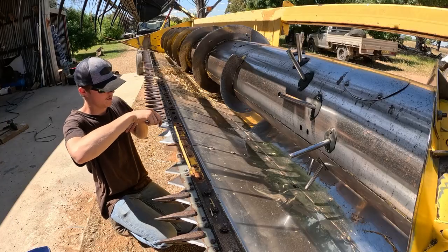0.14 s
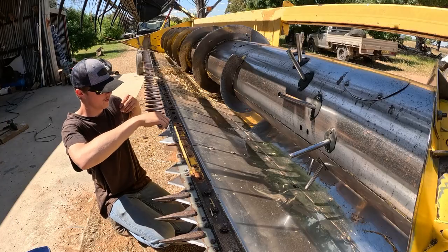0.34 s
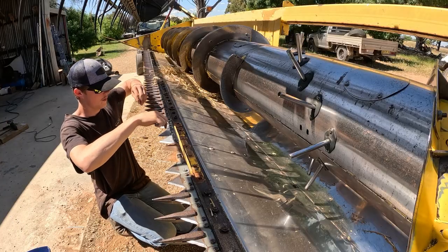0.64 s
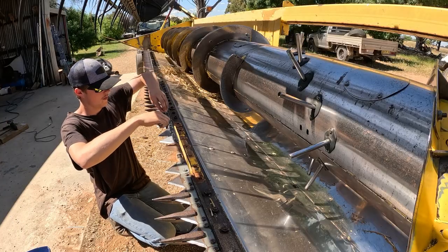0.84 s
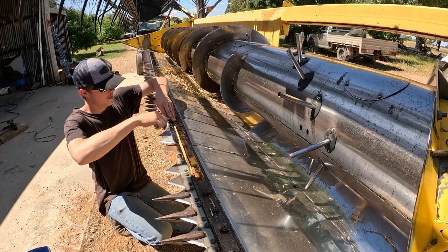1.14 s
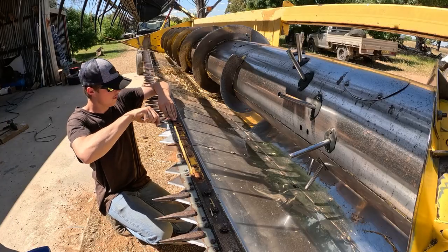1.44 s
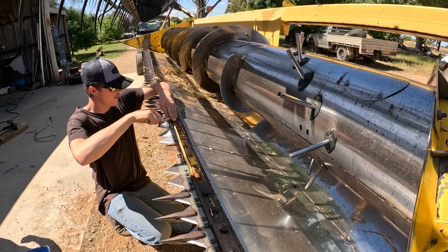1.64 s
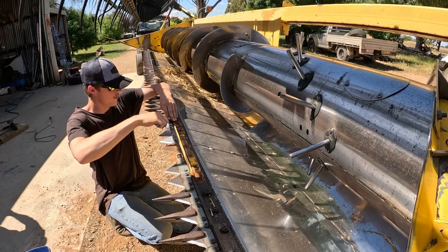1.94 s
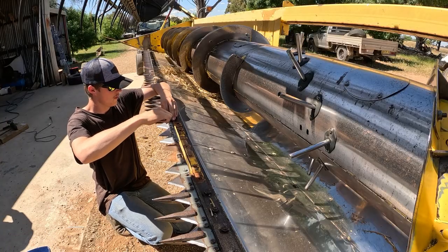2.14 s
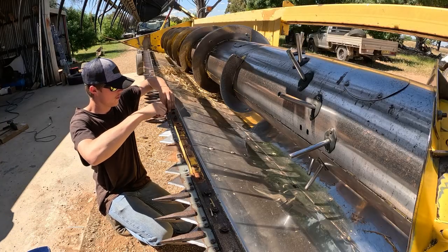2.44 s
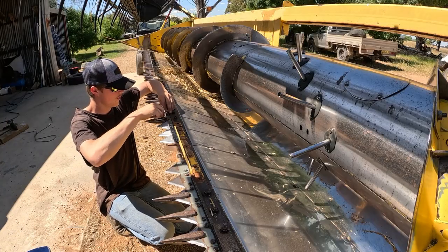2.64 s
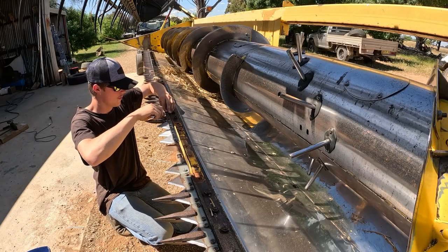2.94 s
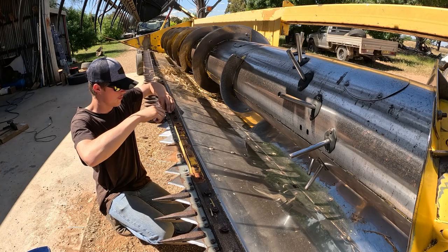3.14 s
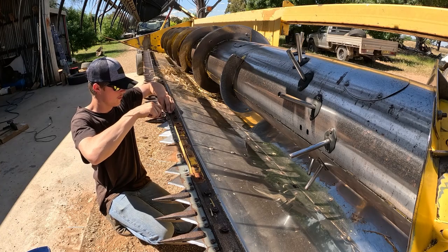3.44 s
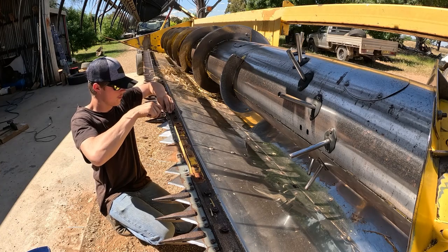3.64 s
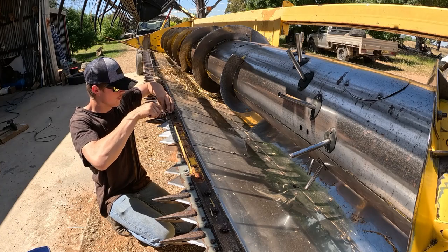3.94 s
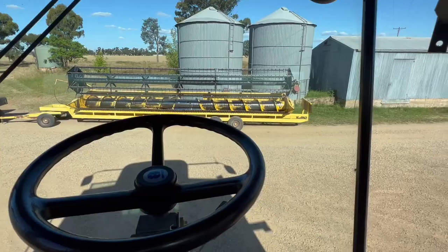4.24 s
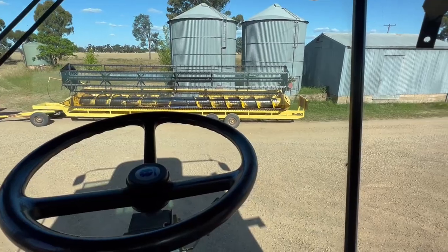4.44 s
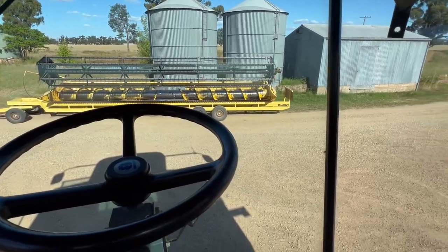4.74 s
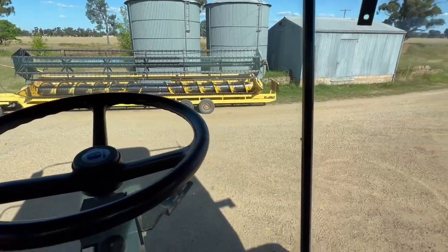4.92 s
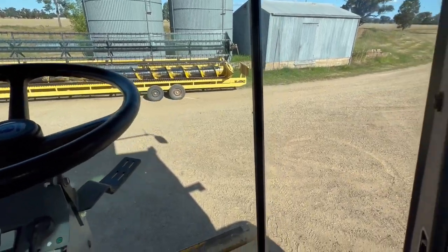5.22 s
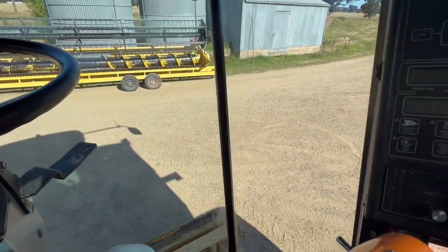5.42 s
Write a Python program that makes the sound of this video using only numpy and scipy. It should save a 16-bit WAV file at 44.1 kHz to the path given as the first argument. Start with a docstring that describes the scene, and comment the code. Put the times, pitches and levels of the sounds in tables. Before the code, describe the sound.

Outdoors, close to the microphone, a small motor whirs and winds down while ratchet teeth click. Tools tap, scrape and knock on a steel trough, over a faint distant diesel idle and open air. Just after four seconds it cuts hard to the inside of a large machine's cab: low engine drone, fan noise, soft bumps and a small rattle on the left.

```python
"""A small motor whirs and sinks to silence, a ratchet ticks, and tools knock and rub on steel close by.
Outdoors beside a harvester front, a big diesel idles some way off as low wavering tones over rumble.
The scene changes at once to the cab of a large machine at idle: crank boom, jolted panels, fan noise.
Motors are sums of shaft multiples, rubs and air are shaped noise, and blows are ringing modes with
noisy contact; each place has its own likeness between the two microphone channels."""
import sys
import numpy as np
from scipy import signal
from scipy.fft import rfft, irfft
from scipy.io import wavfile
from scipy.ndimage import uniform_filter1d

SR = 44100
rng = np.random.default_rng(int(sys.argv[2]) if len(sys.argv) > 2 else 0)


def unload_audio(sound):
    """Save the sound as a 16-bit wav file, at the path given as the first command line argument."""
    columns = np.transpose(np.atleast_2d(sound))
    # keep every value between -1 and 1, then stretch to whole-number steps
    steps = np.round(np.clip(columns, -1, 1) * 32767)
    wavfile.write(sys.argv[1], SR, steps.astype(np.int16))


N = 246078
T = np.arange(N) / SR
F = np.maximum(np.fft.rfftfreq(N, 1 / SR), 1)
CUT_S = 4.124  # yard before, cab after
TOP_HZ = 15800  # upper limit of the microphone channel

# distant diesel tones: (frequency [Hz], level [dB], fading [dB/s])
DIESEL = [(53, -49.5, 1.5), (82.2, -45, 0.36), (130, -44, 1)]
# moments when one hum tone swells or dips: (time [s], length [s], tone [Hz], level change [dB])
HUM_SWELLS = [(0.0091, 0.038, 81.6, -12), (0.13, 0.13, 81.6, 8.5), (3.33, 0.016, 81.6, -16),
              (4, 0.044, 81.6, 0), (3.5, 0.028, 81.6, -10), (0.43, 0.097, 81.6, -14),
              (0.1, 0.067, 129.9, -24), (0.4, 0.11, 129.9, -6), (2, 0.034, 81.6, 5.5),
              (3.573, 0.11, 129.9, -18)]
# colour of the distant rumble: (frequency [Hz], density [dB per Hz])
RUMBLE = [(8.8, -36), (15, -10.5), (64, -1.5), (91, -0.5), (141, -8), (178, -11), (400, -36.5), (520, -62),
          (880, -120)]
# likeness of the two channels in the yard: (frequency [Hz], correlation [-1 to 1])
YARD_LIKE = [(60, 0.99), (130, 1), (290, 0.85), (640, 0.79), (1410, 0.77), (3100, 0.54), (6820, 0.86),
             (15000, 0.33)]
DIESEL_WANDER_DB, RUMBLE_DB = 1, -47

# yard air, 1-4 kHz: (time [s], level [dB])
AIR = [(.7, -58), (.83, -55.5), (1.14, -55), (1.4, -58.5), (2.0, -59.5), (2.15, -67.5), (2.55, -64),
       (3.1, -64), (3.4, -64), (3.56, -70), (3.85, -65), (4.12, -59.5)]
# yard air, 250-900 Hz: (time [s], level [dB])
AIR_BODY = [(.7, -64.5), (1.14, -58), (1.4, -63.5), (3.4, -62), (3.6, -68), (4.12, -72.5)]
# colour of the yard air: (frequency [Hz], density [dB per Hz])
AIR_COLOUR = [(120, -30), (200, 2.5), (422, -11), (479, -13), (618, -15), (842, -23.5), (1300, -19),
              (2700, -26.5), (3480, -30.5), (5490, -33.5), (9660, -42), (15500, -80)]
AIR_TREBLE_DB = -9  # 4.5-10 kHz, relative to 1-4 kHz

# small motor close by: (time [s], shaft rate [Hz], brightness [0-1])
MOTOR = [(0.0, 162.2, 0.26), (.12, 153.6, 0.27), (.21, 159, 0), (.34, 164.7, 0.27), (.39, 166.3, 0.91),
         (.53, 164.9, 0.87)]
# its note, brightening: (multiple of shaft rate, level when dull [dB], level when bright [dB])
MOTOR_ORDERS = [(1, -45, -61), (2, -41, -52), (3, -50.5, -57), (4, -56.5, -49.5), (5, -58, -55),
                (6, -61, -49), (7, -57, -63), (8, -52.5, -54), (9, -59, -59), (10, -61, -57),
                (11, -61, -57), (12, -58, -68), (14, -60.5, -57)]
# colour of its air and brush noise: (frequency [Hz], density [dB per Hz])
WHIR_COLOUR = [(110, -41.5), (180, -2.5), (217, -15.5), (321, -11.5), (401, -16.5), (628, -13),
               (771, -14.5), (1230, -9), (5260, -17), (9550, -28), (14400, -54.5), (15500, -64)]
# likeness of the whir in the two channels: (frequency [Hz], correlation [-1 to 1])
WHIR_LIKE = [(200, 0.91), (3000, 0.66), (9000, 0.75)]
MOTOR_OFF_S, MOTOR_FADE_DB_S = 0.4605, 170
WHIR_DB, WHIR_OFF_S, WHIR_FADE_DB_S = -42.5, 0.63, 65
# throttle shut: the shaft sinks to its idle, heard as one low tone, until it stops
COAST_FROM_S, COAST_SAG_S = .54, .17
IDLE_HZ, IDLE_DB, IDLE_ENDS_S, IDLE_FADE_DB_S = 70.1, -48.5, 2.17, 78.5
COAST_DB = 4.5  # above the idle while the shaft still runs fast

# hands and tools rubbing on steel: (start [s], strongest [s], end [s], pitch of the middle [Hz],
# level of the middle [dB], level 4.5-10 kHz [dB], level 250-900 Hz [dB])
RUBS = [(1.74, 1.78, 2.24, 1450, -54, -62, -60.5), (1.779, 1.798, 2.15, 3300, -59, -57.5, -74),
        (2.225, 2.298, 2.3, 2680, -56.5, -61, -64), (2.35, 2.414, 2.54, 1660, -50, -63, -64),
        (2.61, 2.652, 2.83, 2200, -53.5, -62, -66), (2.791, 2.862, 2.85, 1807, -45.5, -59.5, -56.5),
        (2.837, 2.922, 3.075, 1300, -48.5, -55.5, -48.5), (2.947, 2.977, 3.1, 3100, -48, -64, -62),
        (3.208, 3.238, 3.34, 1640, -42.5, -49, -45), (3.608, 3.649, 3.82, 3000, -54.5, -57.5, -68.5),
        (3.64, 3.681, 3.71, 2300, -47, -55.5, -74), (3.709, 3.724, 3.91, 2190, -63.5, -70, -85),
        (4.02, 4.038, 4.2, 1300, -64, -74, -63)]
# colour of the rubbing noise: (frequency [Hz], density [dB per Hz])
RUB_COLOUR = [(120, -30), (200, -1), (268, -0.5), (339, -10.5), (399, -5.5), (783, -14.5), (974, -3),
              (1810, -2.5), (2900, -6), (3300, -3.5), (3610, -7), (4500, -16), (8500, -25), (15500, -57)]
# resonances under the rubbing: (frequency [Hz], half-width [Hz], boost [dB])
TROUGH = [(398, 23, 8), (577, 36, 8), (1070, 40, 9), (1220, 60, 7), (1600, 70, 4), (2250, 70, 6),
          (2900, 90, 9), (3680, 90, 6), (4000, 80, 5), (4800, 80, 5), (5400, 80, 7), (7480, 200, 3)]
RUB_SPREAD = 1.81  # the middle reaches this factor above and below its pitch

# ratchet teeth: (time [s], level [dB])
TICKS = [(0.2674, -36), (0.3003, -30), (0.3187, -31), (0.3353, -32), (0.3561, -33), (0.381, -31),
         (0.412, -27.5), (0.4695, -35.5), (1.7837, -29.5), (1.8017, -35), (1.817, -28.5), (1.832, -28.5),
         (1.8455, -31), (1.8614, -31), (1.8763, -27.5), (1.8962, -32), (1.9174, -33), (2.2265, -48),
         (2.2476, -49)]
# modes of the ratchet pawl: (frequency [Hz], level [dB], t60 [s])
PAWL = [(2920, -6.5, 0.066), (3860, -10, 0.085), (4820, -18.5, 0.049), (4950, -9, 0.066), (5240, -2.5, .05),
        (5600, -3, 0.036), (6260, -3, 0.039), (6830, 3.5, 0.055), (7430, 3, 0.041), (7840, -0.5, 0.038),
        (9040, -8.5, 0.054), (9600, -4, 0.064), (11400, -10, .015)]
# dull bumps of the sheet floor: (time [s], level [dB], pitch [Hz], t60 [s])
BUMPS = [(0.045, -31, 417, 0.16), (0.098, -32, 500, 0.13), (0.347, -32.5, 162, 0.12),
         (0.993, -37.5, 348, 0.13), (1.688, -39.5, 261, 0.081), (1.785, -49, 520, 0.04),
         (1.866, -39, 420, 0.081), (2.04, -38, 168.9, 0.089), (2.343, -38, 169, 0.17),
         (2.879, -42.5, 320, 0.24), (2.929, -31, 166, 0.082), (3.232, -27.5, 181.6, 0.14),
         (3.265, -30, 184, 0.28)]
# knocks on steel: (time [s], level at 1.2-3.5 kHz [dB], first ring [Hz], longer ring [Hz],
# body relative to that level [dB], treble relative to it [dB], t60 [s],
# steel modes [dB], first ring [dB], longer ring [dB])
KNOCKS = [(0.0431, -31, 4800, 3046, -6, 4, 0.054, 4.5, 1.5, -1.5),
          (0.8687, -36.5, 4470, 6440, -22, -13, 0.013, -20, -17, -14.5),
          (1.101, -50, 7500, 6290, -13, -10, .035, -4, -7, -9),
          (1.219, -52, 2780, 6530, -3, -14, 0.043, -13, -9, -13),
          (1.303, -57, 5000, 7300, -4, -1, 0.05, -8, -10, -7),
          (1.7693, -50, 1520, 3300, 1, -11, 0.047, -4, -1, -8),
          (1.8669, -41, 1583, 2086, 0.5, -11, 0.056, -6, -3, -8),
          (2.0229, -54.5, 3200, 1257, 1, -16, 0.066, -4, -8, -0.5),
          (2.2681, -51.5, 2930, 8020, -6, -0.5, 0.024, 6, -7, -14),
          (2.6136, -40.5, 8140, 2340, -25, 6, .05, 4, -4, -14),
          (2.6676, -54, 5220, 3130, -8, 5, 0.064, 5, -2, -1),
          (2.835, -40, 5200, 2810, -9, -17, 0.078, 0, -13, -7),
          (2.8786, -40, 3530, 6060, -1, -0.5, 0.055, 2, -5.5, -4.5),
          (2.92, -49.5, 5370, 1163, 10, -3, 0.07, -4, -8, 2),
          (2.967, -51.5, 2300, 3670, 4, 1, .08, -3, -3, -3),
          (3.218, -26.5, 2110, 1095, -24, 4, 0.052, 3, -0.5, -19),
          (3.2645, -45, 1940, 3753, 8, -18, 0.037, 0, -11, -6),
          (3.621, -62.5, 5170, 6900, -5, 8, 0.048, -4, -12, 0),
          (3.831, -53, 4930, 2500, -12, -15, .02, -12, -14, -18),
          (3.9648, -60.5, 3121, 9000, -8, 5, 0.027, -8, -4, -10),
          (3.993, -62, 3120, 8000, -10, 6, .025, -8, 0, -8),
          (4.0137, -49.5, 2240, 4300, -8, -7, 0.033, -8, -13, -17)]
# bands of a contact, body to treble: (lower edge [Hz], upper edge [Hz])
KNOCK_BANDS = ((250, 1200), (1200, 3500), (3500, 6500), (6500, 11000))
# modes of the struck steel, before a knock colours them: (frequency [Hz], level [dB], longest t60 [s])
STEEL = [(1080, -6, .06), (2110, -4, .05), (2850, -8, .05), (3750, -8, .05), (4900, -3, .04),
         (5200, -5, .04), (6440, -4, .06), (7350, -3, .05), (8000, -3, .05), (8900, -6, .04),
         (9650, -6, .04)]
# long parts that ring on faintly: (frequency [Hz], level [dB], t60 [s])
BAR = [(400, 6, .3), (570, 6, .35), (1110, 10, .3), (1175, 6, .27), (1940, 6, .25), (2470, 4, .15),
       (3750, 6, .13), (5040, -6, .34), (5490, -4, .5), (5530, -7, .3), (6390, 2, .22), (6585, -3, .25),
       (7290, -7, .38), (8070, -1, .2)]
# colour of close blows at the microphone: (frequency [Hz], gain [dB])
MIC = [(20, 4), (8500, 8.5), (10500, 1.5), (12500, -3), (15800, 3)]
BAR_DB = -19
KNOCK_RISE = .035  # share of the t60

# cab fan noise: (frequency [Hz], density [dB per Hz])
CAB = [(22, -16), (40, -17), (110, 14), (190, -14.5), (450, -15), (600, -11), (820, -11.5), (900, -22),
       (1000, -13.5), (2000, -19.5), (3560, -32), (6450, -33.5), (10000, -50), (15500, -73)]
# its balance: (frequency [Hz], left minus right [dB])
CAB_PAN = [(60, -5.5), (110, -13), (200, 2), (380, 1.5), (700, 2), (1290, 4), (2380, 2), (4400, 7),
           (8120, 9.5), (15000, -17)]
# likeness of the two channels in the cab: (frequency [Hz], correlation [-1 to 1])
CAB_LIKE = [(60, 0.98), (130, -0.64), (290, 0.34), (640, -0.75), (1410, -0.15), (3100, -0.012),
            (6820, 0.12), (15000, -0.5)]
# swell of the fan noise: (time [s], level change [dB])
CAB_SWELL = [(4.12, 3), (4.3, 3.5), (4.45, 0.5), (5.2, -1), (5.4, 1.5), (5.58, 1)]
# cab panels: (frequency [Hz], width [Hz], level [dB])
CAB_MODES = [(189, 14, -3), (238, 20, 5), (317, 14, 1), (430, 30, -6), (515, 20, -6), (600, 25, -6),
             (750, 25, -9)]
# crank of the idling machine: (time [s], rate [turns/s])
CRANK = [(4.12, 16.03), (4.38, 16.0), (4.47, 15.84), (5.25, 15.83), (5.58, 15.73)]
# boom in the cab: (multiple of crank rate, relative level [dB])
CRANK_ORDERS = [(2, -18), (3, -12), (4, -24), (5, 1), (6, -14), (7, -25.5), (8, -18.5), (9, -29), (10, -26),
                (12, -33), (37, -33)]
# soft bumps and creaks in the cab: (time [s], level [dB], pitch [Hz])
CAB_BUMPS = [(4.229, -42.5, 610), (4.299, -45, 612), (4.359, -57, 606), (4.449, -55, 1120),
             (4.585, -45.5, 1534), (4.795, -50, 575), (4.91, -45, 754), (4.999, -43.5, 602),
             (5.124, -41, 548), (5.347, -52, 560)]
# small rattle on the left in the cab: (time [s], level [dB])
RATTLE = [(5.383, -42), (5.397, -43), (5.4111, -44), (5.425, -41), (5.461, -45), (5.478, -47),
          (5.4944, -55), (5.532, -50), (5.5498, -52.5)]
CAB_DB, CAB_BASS_DB = -53.5, -55  # fan noise at 300 Hz-3 kHz, and below 140 Hz
CAB_MODES_DB, BOOM_DB = -59, -38
RATTLE_HZ, RATTLE_PAN_DB = 4740, 16


def undb(db):
    """Gain of a level in dB."""
    return 10 ** (np.asarray(db) / 20)


def unit(x):
    """Scale to rms 1."""
    return x / np.sqrt(np.mean(x ** 2))


def over_time(table):
    """Columns of a table drawn as lines over time."""
    s, *columns = np.transpose(table)
    return [np.interp(T, s, column) for column in columns]


def over_hz(table):
    """A table drawn as a line over log frequency."""
    hz, value = np.transpose(table)
    return np.interp(np.log(F), np.log(hz), value)


def fade(after_s, db_per_s):
    """Gain 1 up to a moment, then sinking steadily."""
    return undb(-db_per_s * np.maximum(T - after_s, 0))


def walk(rate):
    """Random levels held 1 / rate s and smoothed twice; rms 1."""
    k = int(SR / rate)
    steps = np.repeat(rng.standard_normal(N // k + 1), k)
    return unit(uniform_filter1d(uniform_filter1d(steps, k), k)[:N])


def pan(x, db):
    """Place a sound by level difference, left minus right."""
    return x * undb(np.array([[db], [-db]]) / 2)


def add(out, s, y):
    """Mix a sound in at a moment."""
    i = int(s * SR)
    n = min(y.shape[-1], N - i)
    out[..., i:i + n] += y[..., :n]


def tone(hz, waver):
    """A machine tone of rms 1 whose pitch wavers."""
    turn = 2 * np.pi * np.cumsum(hz * (1 + waver * walk(5.96))) / SR
    return np.sqrt(2) * np.sin(turn + rng.uniform(0, 2 * np.pi))


def hiss(colour, like, grain_db=0., pan_db=0 * F):
    """Two-channel noise spectrum of a given colour and likeness; grain makes it crackly."""
    mid, side = (rfft(rng.standard_normal(N) * undb(grain_db * walk(300))) for _ in range(2))
    likeness = np.clip(over_hz(like), -.99, .995)
    mid, side = mid * np.sqrt(1 + likeness), side * np.sqrt(1 - likeness)
    left = (mid + side) * undb(pan_db / 2)
    right = (mid - side) * undb(-pan_db / 2)
    return np.array([left, right]) * undb(over_hz(colour))


def band(spectrum, lo, hi, ref=None):
    """A band of a spectrum as sound, scaled to rms 1 within the band ref (by default itself)."""
    ref_lo, ref_hi = ref or (lo, hi)
    scale = np.std(irfft(spectrum * ((F > ref_lo) & (F < ref_hi)), N))
    return irfft(spectrum * ((F >= lo) & (F < hi)), N) / scale


def three_bands(colour, grain_db, resonances=()):
    """Middle, treble and body of one noise, split by smooth slopes."""
    s = hiss(colour, YARD_LIKE, grain_db)
    s = s * undb(sum(db / (1 + ((F - hz) / w) ** 2) for hz, w, db in resonances))
    high = 1 / (1 + (4250 / F) ** 6)
    low = 1 / (1 + (F / 900) ** 8)
    middle = band(s * (1 - high - low), 200, SR, (1000, 4000))
    treble = band(s * high, 950, SR, (4500, 10000))
    body = band(s * low, 200, SR, (250, 900))
    return middle, treble, body


def ring(modes, scatter_db):
    """Decaying modes with levels, pitches and phases scattered afresh; peak 1."""
    t = np.arange(int(.35 * SR)) / SR
    hz, db, t60 = np.transpose(modes)[:, :, None]
    level, detune, phase = rng.standard_normal((3, len(modes), 1))
    waves = np.sin(2 * np.pi * hz * (1 + 0.004 * detune) * t + 3 * phase)
    tones = undb(db + scatter_db * level) * waves * 1000. ** (-t / t60)
    y = tones.sum(axis=0) * np.minimum(t / 0.002, 1)
    return y / np.abs(y).max()


def cluster(hz, t60):
    """Three close modes that beat into one rough ring."""
    return ring([(hz, 0, t60), (.95 * hz, -7, .7 * t60), (1.06 * hz, -6, .7 * t60)], 1.5)


def crack(bands, levels_db, t60, rise_s):
    """Dense noisy contact: a decaying noise burst in each band, a third of rms 1 before decay."""
    t = np.arange(int(.35 * SR)) / SR
    out = 0
    for edges, db in zip(bands, levels_db):
        sos = signal.butter(2, edges, "band", fs=SR, output="sos")
        mid, side = signal.sosfilt(sos, rng.standard_normal((2, len(t))))
        y = unit(mid + 0.37 * side * np.array([[1], [-1]]))
        out = out + undb(db) / 3 * y * 1000. ** (-t / t60) * np.minimum(t / rise_s, 1)
    return out


def diesel():
    """Distant idle: low wavering tones, briefly swelling or dipping, over rumble below 330 Hz."""
    tones = 0
    for hz, db, fade_db in DIESEL:
        swell_db = sum(g * np.exp(-((T - s) / length) ** 2)
                       for s, length, near_hz, g in HUM_SWELLS if abs(near_hz - hz) < 12)
        level_db = db - fade_db * T + swell_db + DIESEL_WANDER_DB * walk(8.2)
        tones = tones + undb(level_db) * tone(hz, waver=0.00772)
    rumble = band(hiss(RUMBLE, YARD_LIKE), 0, 330)
    return pan(tones, -0.26) + undb(RUMBLE_DB + 0.31 * walk(3.8)) * rumble


def yard_air():
    """Open air: three bands of lightly grained noise, each following a slow level line."""
    air_db, = over_time(AIR)
    body_db, = over_time(AIR_BODY)
    start, end = AIR[0][0], AIR[-1][0]
    gate = np.clip(np.minimum(T - start + .01, end - T + .01) / .01, 0, 1)
    levels = air_db, air_db + AIR_TREBLE_DB, body_db
    bands = three_bands(AIR_COLOUR, grain_db=0.5)
    air = sum(y * undb(db + 1.0 * walk(8.2)) for y, db in zip(bands, levels))
    return pan(gate * air, 0.7)


def motor_hum(shaft_hz, brightness):
    """Multiples of the shaft rate, each flickering in level, until the motor shuts off."""
    turn = 2 * np.pi * np.cumsum(shaft_hz * (1 + 0.0015 * walk(30.0))) / SR
    hum = 0
    for k, dull_db, bright_db in MOTOR_ORDERS:
        level_db = dull_db + brightness * (bright_db - dull_db) + 1.6 * walk(17.9)
        hum = hum + undb(level_db) * np.sqrt(2) * np.sin(round(k) * turn + k * k)
    return hum * fade(MOTOR_OFF_S, MOTOR_FADE_DB_S)


def motor_coast(shaft_hz):
    """One low tone as the shaft sinks to its idle, quieter as it slows."""
    sag = np.exp(-(np.maximum(T - COAST_FROM_S, 0) / COAST_SAG_S) ** 1.46)
    slow_hz = IDLE_HZ + (shaft_hz - IDLE_HZ) * sag
    level_db = IDLE_DB + COAST_DB * np.clip((slow_hz - IDLE_HZ) / 25, 0, 1) + 1.5 * walk(4.7)
    gate = np.clip((T - MOTOR_OFF_S) / 0.15, 0, 1) * fade(IDLE_ENDS_S, IDLE_FADE_DB_S)
    return tone(slow_hz, waver=0.013) * undb(level_db) * gate


def motor():
    """Shaft tones of the small motor over its air and brush noise."""
    shaft_hz, brightness = over_time(MOTOR)
    tones = motor_hum(shaft_hz, brightness) + motor_coast(shaft_hz)
    whir = band(hiss(WHIR_COLOUR, WHIR_LIKE, grain_db=0.9), 0, SR, (900, 6000))
    return pan(tones, 0.98) + whir * undb(WHIR_DB) * fade(WHIR_OFF_S, WHIR_FADE_DB_S)


def rubbing():
    """Grainy noise strokes through steel resonances, swelling and dying away."""
    out = np.zeros((2, N))
    grit, treble, body = three_bands(RUB_COLOUR, grain_db=1.6, resonances=TROUGH)
    for start, top, end, hz, *levels in RUBS:
        span = slice(int(start * SR), int(end * SR))
        t = T[span]
        stroke = np.interp(t, (start, top, end), (0, 1, 0)) ** np.where(t < top, .8, 1.6)
        around_pitch = signal.butter(2, (hz / RUB_SPREAD, hz * RUB_SPREAD), "band", fs=SR)
        middle = unit(signal.lfilter(*around_pitch, grit[:, span]))
        layers = middle, treble[:, span], body[:, span]
        out[:, span] += stroke * sum(y * undb(db) for y, db in zip(layers, levels))
    return pan(out, 0.7)


def bumps(out):
    """Dull bumps of the sheet floor: three close low modes and a soft contact."""
    for s, db, hz, t60 in BUMPS:
        sheet = ring([(hz, 0, t60), (1.2 * hz, -5, t60), (0.88 * hz, -6, t60)], 4.1)
        bump = undb(-9.5) * sheet + crack([(150, 500)], [-12], t60, 0.003)
        add(out, s, undb(db) * bump)


def ratchet(out):
    """Each tooth sets the pawl's modes ringing with a sharp noisy contact."""
    for s, db in TICKS:
        contact = crack(KNOCK_BANDS[1:], (-24, -17, -11), 0.045, 0.0008)
        add(out, s, pan(undb(db) * (undb(-8.5) * ring(PAWL, 3.1) + contact), 0.67))


def knocks(out):
    """Noisy contact, two rings of the knock's own, and the steel's modes coloured by the blow."""
    tops = [hi for lo, hi in KNOCK_BANDS]
    for s, db, ring_hz, long_hz, body_db, treble_db, t60, steel_db, ring_db, long_db in KNOCKS:
        levels_db = body_db, 0, .5 * treble_db, treble_db
        top_db = max(levels_db[1:]) + steel_db
        blow = crack(KNOCK_BANDS, levels_db, t60, KNOCK_RISE * t60)
        blow = blow + undb(ring_db) * cluster(ring_hz, .6 * t60)
        blow = blow + undb(long_db) * cluster(long_hz, 1.1 * t60)
        # the blow's colour decides which modes sound
        struck = [(hz, g + levels_db[np.searchsorted(tops, hz)], min(longest, 1.4 * t60))
                  for hz, g, longest in STEEL]
        steel = undb(top_db - 6) * ring(struck, 3.) + undb(top_db + BAR_DB) * ring(BAR, 1.5)
        add(out, s, pan(undb(db) * (blow + steel), 0.96))


def handwork():
    """Blows close to the microphone; the steel trough and the ground return a short diffuse tail."""
    out = np.zeros((2, N))
    bumps(out)
    ratchet(out)
    knocks(out)
    t = np.arange(int(.25 * SR)) / SR
    tail = rng.standard_normal((2, len(t))) * 1000. ** (-t / 0.16) * np.minimum(t / 0.0017, 1)
    out = out + undb(-41.0) * signal.fftconvolve(out, tail, axes=1)[:, :N]
    return irfft(rfft(out) * undb(over_hz(MIC)), N)


def cab_fan():
    """Fan noise in half-octave bands that flicker separately, over steady bass noise."""
    s = hiss(CAB, CAB_LIKE, grain_db=1.5, pan_db=over_hz(CAB_PAN))
    air = undb(CAB_BASS_DB) * band(s, 0, 140)
    swell_db, = over_time(CAB_SWELL)
    for lo in 140 * 2. ** np.arange(0, 7, .5):
        flicker = undb(1.5 * walk(12) + swell_db)
        air = air + undb(CAB_DB) * flicker * band(s, lo, lo * np.sqrt(2), (300, 3000))
    return air


def cab_panels(turn):
    """Panel resonances jolted once a crank turn, with uneven strength."""
    count = turn.astype(int)
    strength = undb(2.5 * rng.standard_normal(count[-1] + 1)[count])
    jolts = rfft(strength * (np.diff(count, prepend=0) > 0))
    panels = sum(undb(db) / (1 + 1j * (F - hz) / (w / 2)) ** 2 for hz, w, db in CAB_MODES)
    return undb(CAB_MODES_DB) * unit(irfft(jolts * panels, N))


def cab_boom(turn):
    """Multiples of the crank rate; all but the fifth waver in level."""
    boom = 0
    for k, db in CRANK_ORDERS:
        wave = np.sqrt(2) * np.sin(k * (2 * np.pi * turn + 0.33 * k))
        boom = boom + undb(db + (k != 5) * 1.0 * walk(5.8)) * wave
    return pan(boom * undb(BOOM_DB), -5.0)


def cab_knocks(out):
    """Soft bumps and creaks, and a small rattle: one short mode each with a noisy contact."""
    for s, db, hz in CAB_BUMPS:
        contact = crack([(480, 860), (950, 2900)], [-3, -8], 0.12, 0.012)
        add(out, s, pan(undb(db) * (undb(-7.5) * ring([(hz, 0, .12)], 0.) + contact), 2.5))
    for s, db in RATTLE:
        contact = crack([(3500, 5900), (4400, 5200)], [-3, -6], 0.011, 0.001)
        click = undb(-14) * ring([(RATTLE_HZ, 0, .012)], 0.) + contact
        add(out, s, pan(undb(db) * click, RATTLE_PAN_DB))


def cab():
    """Inside the cab: fan noise, panels and boom driven by one crank, bumps and a rattle."""
    crank_hz, = over_time(CRANK)
    turn = np.cumsum(crank_hz * (1 + 0.002 * walk(2.98))) / SR
    out = cab_fan() + cab_panels(turn) + cab_boom(turn)
    cab_knocks(out)
    return out


def scene():
    """The yard gives way to the cab within 3 ms; blows may ring across."""
    inside = np.clip((T - CUT_S) / .003, 0, 1)
    yard = diesel() + yard_air() + motor() + rubbing()
    return yard * (1 - inside) + handwork() + cab() * inside


def record(dry):
    """The microphone channel cuts the top steeply."""
    return signal.sosfilt(signal.ellip(8, .2, 70, TOP_HZ, fs=SR, output="sos"), dry)


dry = scene()
out = record(dry)
unload_audio(out)
```